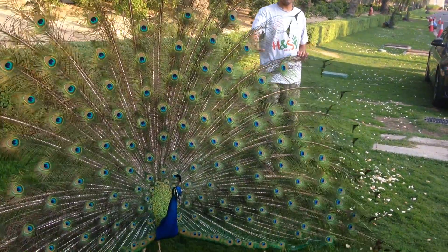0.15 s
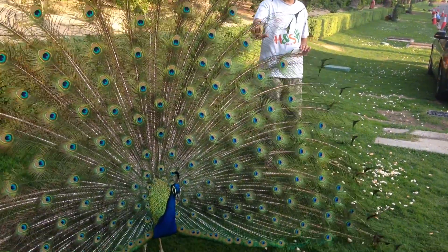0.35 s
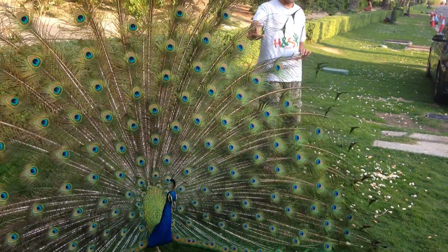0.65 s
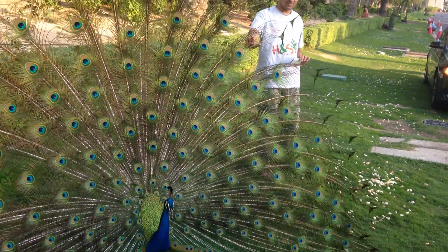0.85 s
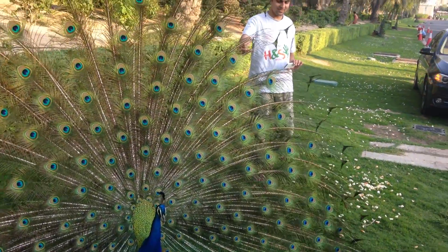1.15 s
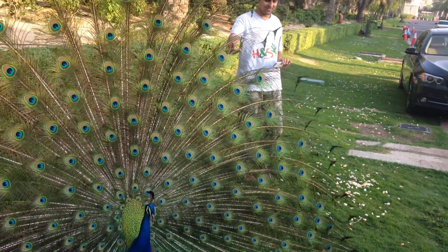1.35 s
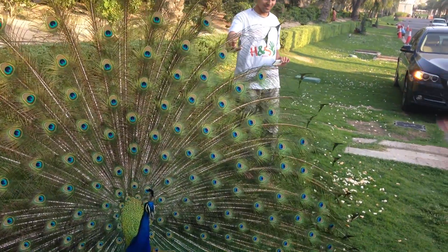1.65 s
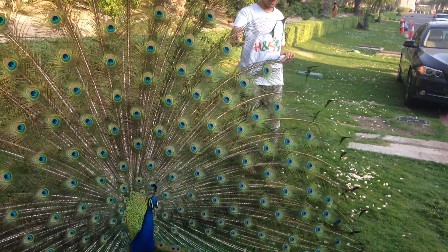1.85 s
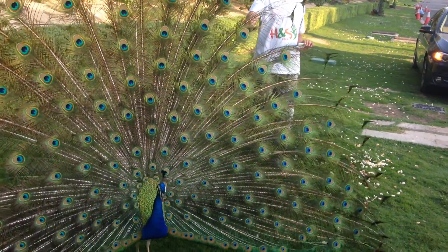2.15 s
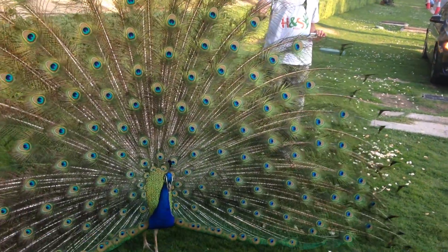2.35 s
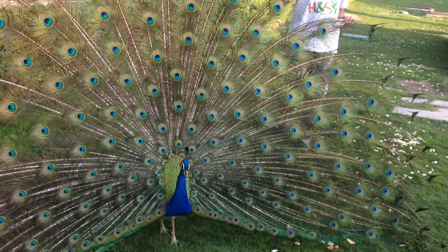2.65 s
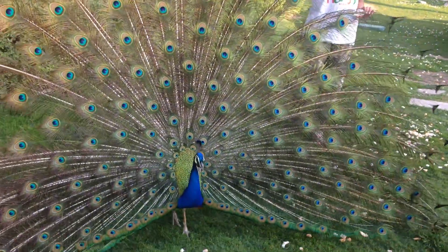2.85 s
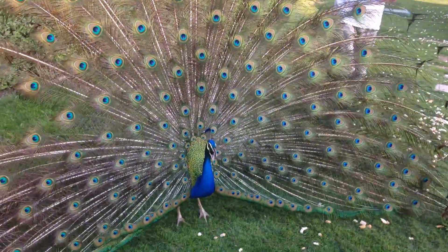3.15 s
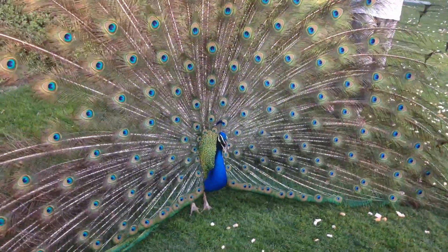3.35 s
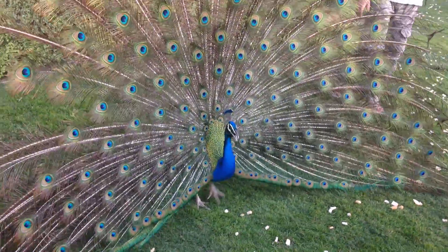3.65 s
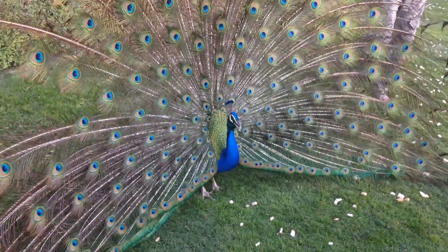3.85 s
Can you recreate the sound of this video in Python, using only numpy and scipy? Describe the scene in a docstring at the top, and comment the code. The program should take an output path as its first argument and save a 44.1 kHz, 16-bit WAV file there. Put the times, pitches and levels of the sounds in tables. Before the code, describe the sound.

A peacock screams loudly, close by, from about 2.8 to 3.7 seconds, harsh and throbbing with a faint echo; a second call starts near 3.9 seconds and is cut off. Before this, small birds chirp and a dove coos far off, a nearer bird whistles two notes six times, and something thuds softly near 1.8 seconds. An idling engine and traffic rumble throughout, with a faint outdoor hiss.

```python
"""A peacock screams close to the microphone, on a lawn: one full call and the start of a second, its voice
a stack of overtones that throbs about 46 times a second and echoes faintly off hedges and walls.
Before it, small birds chirp far off, a dove coos, a nearer bird repeats a whistled two-note call, and
something thuds softly. An idling engine and traffic rumble throughout, under a faint outdoor hiss.
One microphone feeds both channels."""
import sys
import numpy as np
from scipy import signal
from scipy.fft import rfft, irfft, next_fast_len
from scipy.io import wavfile
from scipy.ndimage import uniform_filter1d, map_coordinates

SR = 44100
rng = np.random.default_rng(int(sys.argv[2]) if len(sys.argv) > 2 else 0)


def transcribe(signal):
    """Save signal, clipped to [-1, 1], as a 16-bit WAV file at the path in sys.argv[1]."""
    frames = np.atleast_2d(signal).T
    limited = np.clip(frames, -1, 1)
    pcm = np.round(limited * 32767).astype(np.int16)
    wavfile.write(sys.argv[1], SR, pcm)


N = 176400
T = np.arange(N) / SR

# Level of the low rumble, with a dip under the scream where a recorder's automatic gain would duck it.
# Each row: time in seconds, level in dB.
RUMBLE_LEVELS = [(0, -50.5), (.45, -47), (.7, -49.5), (.95, -49), (1.1, -45), (1.35, -45.5), (1.5, -46.5),
                 (2.0, -48.5), (2.3, -47.5), (2.55, -49.5), (2.75, -44), (2.9, -51.5), (3.05, -47),
                 (3.15, -55.5), (3.45, -53.5), (3.6, -53.5), (4.0, -50)]
# Spectra of the traffic and the outdoor hiss. Each row: frequency in Hz, relative level in dB.
TRAFFIC_SPECTRUM = [(13, -64), (22, -20), (70, -2), (86, 0.5), (118, -8.5), (172, -11), (225, -17.5),
                    (249, -17), (278, -35), (328, -35.5), (363, -37.5), (407, -28.5), (450, -48),
                    (580, -68.5), (990, -120)]
HISS_SPECTRUM = [(180, -21.5), (300, -0.5), (455, -10), (528, -3.5), (2170, -19), (2480, -19),
                 (4910, -18.5), (6300, -23.5), (14500, -27.5), (16000, -40)]
# Far birds. Each row: start and length in seconds, first, middle and last pitch in Hz, level in dB.
FAR_CHIRPS = [(.02, .04, 4900, 4670, 4500, -73), (.12, 0.036, 4600, 4900, 4700, -76),
              (0.088, 0.033, 2480, 2480, 2450, -71), (0.185, 0.035, 4760, 4800, 4750, -73),
              (.225, 0.027, 2480, 2470, 2460, -77), (0.294, 0.025, 5900, 4970, 4500, -77),
              (0.306, .03, 5300, 4500, 4170, -71), (0.334, 0.062, 4340, 4186, 4210, -68),
              (0.371, 0.037, 2930, 2896, 2920, -64.5), (0.527, 0.022, 3420, 3400, 3400, -75),
              (0.556, 0.032, 4920, 4440, 3480, -69), (0.581, 0.006, 2650, 2590, 2580, -57),
              (0.791, .025, 4040, 3860, 4000, -70), (.82, .03, 3250, 3500, 4140, -71),
              (1.126, 0.033, 2690, 2680, 2250, -68), (1.331, 0.03, 3200, 3830, 4200, -64),
              (1.35, 0.066, 4180, 4050, 3270, -58.5), (1.339, 0.056, 4320, 4660, 4200, -62),
              (1.442, 0.043, 2680, 2690, 2600, -60.5), (1.594, 0.024, 3820, 3540, 3200, -63),
              (1.747, 0.04, 2730, 2710, 2470, -63.5), (1.98, 0.019, 3450, 3410, 3500, -70.5),
              (2.004, 0.023, 2920, 2660, 2550, -72), (2.354, 0.042, 5160, 4520, 3200, -68),
              (2.375, 0.051, 4150, 4700, 5500, -69), (2.38, 0.044, 2490, 2380, 2350, -69),
              (2.473, .025, 5020, 4780, 4780, -67.5), (2.508, 0.019, 2750, 2740, 2750, -68),
              (2.63, .075, 2410, 2660, 2740, -65.5)]
DOVE_COOS = [(.27, 0.2, 504, 535, 480, -65), (1.085, 0.19, 484.5, 521, 507, -61.5),
             (1.35, 0.38, 520.4, 512.5, 489, -64.5), (2.28, 0.2, 537, 538, 520, -67)]
# The nearer bird. Each row: start of the second note in seconds, first note's pitch in Hz and level in
# dB, second note's pitch in Hz, length in seconds, level in dB and overtone level in dB, and the first
# note's sag as a share of its pitch.
TWO_NOTE_CALLS = [(0.598, 3117, -61, 2052, 0.09, -67, -68.5, 0.028),
                  (0.907, 2810, -58, 2040, 0.074, -59, -69, -0.016),
                  (1.194, 2770, -55.5, 2080, 0.088, -60, -65, .06),
                  (1.506, 2883, -56.5, 2057, 0.081, -66, -63.5, -.08),
                  (1.817, 2836, -54, 1976, 0.085, -59.5, -68, -0.015),
                  (2.142, 2860, -56.5, 2056, 0.089, -64, -64.5, 0.018)]
# Partials of its notes and rasps. Each row: multiple of the pitch, relative level in dB.
FIRST_NOTE_PARTIALS = [(.5, -14), (1.5, -16), (2, -15), (2.5, -22), (3, -21), (3.5, -24)]
SECOND_NOTE_PARTIALS = [(2, 3), (3, -3), (4, -13), (5, -14)]
RASP_PARTIALS = [(1, -2), (.9, 0), (.8, 0), (.71, 0)]
# The thud's modes. Each row: frequency in Hz, relative level in dB, seconds to die away by 60 dB.
THUD_MODES = [(201, 7, 0.081), (116, 3.5, 0.11), (305, -27, .05)]
# The peacock, one list a call. Each row: time in seconds, pitch in Hz, levels of partials 1, 2, 3, 4
# and of the higher ones together in dB, beak posture 0-4, throb depth 0-1, throbs a second,
# hoarseness 0-1.
SCREAMS = [
    [(2.82, 585, -56, -64, -74, -90, -89, -8, 0.3, 43, .28),
     (2.832, 611, -38, -36.5, -49, -80, -47.5, 0.5, 0.25, 36, 0.2),
     (2.861, 675, -33.5, -37, -59, -66, -41, 4, 0.55, 56, 0.2),
     (2.868, 663, -35, -26, -41, -46, -31, 2, 0.9, 58, 0.3),
     (2.91, 694.5, -29, -27, -36, -32.5, -22, 3, 0.29, 53, 0.2),
     (2.94, 714, -24, -16.5, -18, -21.5, -17.5, 0, .1, 59, 0.15),
     (2.97, 725, -22.5, -18, -10, -21, -19, 0.5, 0, 50, 0.16),
     (3.015, 730, -24, -29, -11, -22.5, -19.5, -0.5, 0.15, 47.5, 0.02),
     (3.06, 727.8, -27.5, -23.5, -14, -20, -22.5, -2.5, 0.14, 65, 0.11),
     (3.13, 721.8, -29.5, -21, -17, -17.5, -21.5, 0, 0.08, 48, 0.09),
     (3.2, 724.2, -28.5, -15, -24, -18, -19, 0.5, 0.18, 60.5, 0.07),
     (3.27, 721.4, -27.5, -11, -33.5, -22.5, -20, 1, 0.02, 55, 0.04),
     (3.32, 710.2, -29.5, -15, -40.5, -32.5, -21.5, 2.74, 0.26, 59, 0.22),
     (3.38, 698, -30, -17, -47, -46, -25.5, 2, 0, 44.4, 0.12),
     (3.44, 700, -32.5, -9.5, -45, -48.5, -24, 2.5, 0.64, 48, 0.18),
     (3.488, 698, -32.5, -13, -44, -50, -24.5, 2, 0.58, 48, 0),
     (3.512, 695.4, -33.5, -11, -40, -53, -25.5, 1.5, 0.69, 50, 0.2),
     (3.57, 680, -34, -16, -32, -64, -29.5, 3, 0.87, 44, 0.01),
     (3.63, 660, -34, -28, -39, -63, -40, 3, 0.89, 50, 0.12),
     (3.69, 627.6, -34.5, -47.5, -60.5, -68, -57, 2.5, 1, 33, 0.02),
     (3.705, 655, -81, -75.5, -83, -97.5, -86.5, 4.5, 0.87, 68, 0.01)],
    [(3.853, 621, -54, -60, -80, -99.5, -75, 3, 0.53, 48, 0.4),
     (3.864, 660, -22.5, -31, -40, -77, -40, 2.63, 0.43, 28, 0.3),
     (3.88, 721.7, -21.5, -62.5, -58, -46.5, -44, 2.7, 0.75, 46, 0.45),
     (3.9, 764, -26, -46, -57, -43.5, -44, 2.8, 0.75, 39, 0.3),
     (3.926, 743, -18, -43, -51, -40, -41.5, 2.3, 0.5, 60, .4),
     (3.94, 708, -22, -24.5, -52, -55, -23.5, 4.7, 0.35, 38, 0.31),
     (3.97, 721, -24.5, -18.5, -48, -39.5, -21.5, 3.3, 0.71, 57, 0),
     (4.0, 712, -22, -21, -55, -40, -24, 4.4, 0, 37, 0.1)],
]
# Its tone in five beak postures, one list each, heard from partial 5 up.
# Each row: partial number, relative level in dB.
BEAK_POSTURES = [
    [(1, -12), (2, -11), (3, 0), (4, -9), (5, -19), (6, -13.5), (7, -16), (8, -21.5), (9, -26), (10, -23.5),
     (11, -26), (12, -21.5), (13, -19.5), (14, -21.5), (15, -25.5), (16, -29), (17, -27.5), (18, -25),
     (19, -40), (20, -43), (21, -41.5)],
    [(1, -14), (2, 0), (3, -14), (4, -7), (5, -24), (6, -22), (7, -20), (8, -11), (9, -12), (10, -15),
     (11, -19), (12, -15.5), (13, -19.5), (14, -22.5), (15, -25), (16, -26), (17, -30), (18, -38),
     (19, -30), (20, -33), (21, -39.5)],
    [(1, -18), (2, 0), (3, -32), (4, -39), (5, -29), (6, -18), (7, -19), (8, -23), (9, -24.5), (10, -25.5),
     (11, -34.5), (12, -33), (13, -31), (14, -31.5), (15, -33), (16, -44), (17, -51.5), (18, -63.5),
     (19, -56.5), (20, -61.5), (21, -53)],
    [(1, -4), (2, 0), (3, -12), (4, -37), (5, -21), (6, -28.5), (7, -28.5), (8, -29), (9, -27.5), (10, -23),
     (11, -21), (12, -33.5), (13, -36), (14, -29.5), (15, -37.5), (16, -37), (17, -43), (18, -39),
     (19, -33.5), (20, -41), (21, -49.5)],
    [(1, -1), (2, 0), (3, -30), (4, -21), (5, -9), (6, -15), (7, -18), (8, -29), (9, -10.5), (10, -4.5),
     (11, -13.5), (12, -14), (13, -13), (14, -17), (15, -17.5), (16, -22), (17, -16.5), (18, -25),
     (19, -22), (20, -32.5), (21, -20.5)],
]
# How its partials throb. Each row: multiple of the pitch, depth of its own beat 0-1, that beat's lead
# in radians, share of the common throb 0-1.
PARTIAL_THROBS = [(1.001, 0, 0, 0.69), (1.86, 0.36, 4, 0.95), (2.93, 0.09, 1.5, 0.86),
                  (4.255, 0.43, 5.5, 0.45), (5.07, 0.6, 4, 1), (6, 0.2, 4.5, 0.51), (7.1, 0.7, 2.46, 1),
                  (8.64, 0.7, 3, 0.94), (8.54, 0.8, -0.5, 0.8), (9.7, 0.2, 6, 1), (11.7, 0.4, 2, 1),
                  (13.6, 0.1, 5.5, 0.69), (21, 0.2, -5.5, 0.93)]
# Its breath. Each row: frequency in Hz, relative level in dB.
BREATH_SPECTRUM = [(400, -27), (1000, -8), (1700, -3), (2200, 2), (2700, -10), (4000, -22), (6500, -10),
                   (12000, -8.5), (16000, -27.5)]


def amp(db):
    """Decibels as an amplitude."""
    return 10 ** (np.asarray(db) / 20)


def unit(x):
    """x scaled to rms 1."""
    return x / np.sqrt(np.mean(x ** 2) + 1e-20)


def wobble(rate):
    """A smooth random curve, rate knots a second."""
    return map_coordinates(rng.standard_normal(int(N * rate / SR) + 4), [T * rate])


def filtered(x, response):
    """x through a gain that depends on frequency in Hz."""
    size = next_fast_len(N + SR // 2)
    return irfft(rfft(x, size) * response(np.fft.rfftfreq(size, 1 / SR)), size)[..., :N]


def rush(spectrum, patchy_db):
    """Coloured noise of rms 1 with patches of random gain."""
    bins = signal.stft(rng.standard_normal(N), nperseg=512)[2]
    patches = uniform_filter1d(uniform_filter1d(rng.standard_normal(bins.shape), 6, 0), 12, 1)
    noise = signal.istft(bins * amp(patchy_db * unit(patches)), nperseg=512)[1][:N]
    knot_hz, db = np.transpose([(10, -120), *spectrum, (SR / 2, -120)])
    return unit(filtered(noise, lambda hz: amp(np.interp(np.log(hz + 1), np.log(knot_hz + 1), db))))


def echoed(dry, db, t60_s, gap_s):
    """The direct sound and, after a gap, a diffuse dying echo."""
    t = T[:SR // 2]
    tail = rng.standard_normal(len(t)) * amp(-60 * t / t60_s) * (t > gap_s)
    return dry + amp(db) * signal.fftconvolve(dry, tail / np.linalg.norm(tail))[:N]


def add_whistle(out, start, hz, db, partials=((1, 0),), flutter_db=4.5, flutter_per_s=200):
    """Adds a soft-ended note along the pitch curve hz; each partial flutters in level."""
    u = np.linspace(0, 1, len(hz))
    knots = np.linspace(0, 1, int(len(hz) * flutter_per_s / SR) + 2)
    phase = 2 * np.pi * np.cumsum(hz) / SR
    note = 0
    for multiple, partial_db in partials:
        flutter = np.interp(u, knots, rng.normal(0, flutter_db, len(knots)))
        note += amp(partial_db + flutter) * np.sin(multiple * phase)
    fade = np.clip(9 * np.minimum(u, 1 - u), 0, 1)
    out[round(start * SR):][:len(hz)] += np.sqrt(2) * amp(db) * fade * note


def traffic_and_engine():
    """Low traffic noise with the wavering hum of an idling engine."""
    hum_hz = 89 + 3.88 * wobble(3.3)
    hum = np.sin(2 * np.pi * np.cumsum(hum_hz) / SR) * amp(-1 + 1.1 * wobble(11))
    level_db = np.interp(T, *np.transpose(RUMBLE_LEVELS))
    return amp(level_db) * unit(rush(TRAFFIC_SPECTRUM, patchy_db=1.5) + hum)


def outdoor_hiss():
    """The faint, steady noise of the open air."""
    return amp(-60.5) * rush(HISS_SPECTRUM, patchy_db=.7)


def far_birds():
    """Small birds and a dove, far off: each chirp or coo is one whistle bent through three pitches."""
    out = np.zeros(N)
    for start, length, first, middle, last, db in FAR_CHIRPS + DOVE_COOS:
        u = np.linspace(-1, 1, round(length * SR))
        hz = middle + (last - first) / 2 * u + ((first + last) / 2 - middle) * u ** 2
        add_whistle(out, start, hz, db)
    return out


def two_note_bird():
    """The nearer bird: grit, a short high note, flicks, a longer note that drops to its pitch, a rasp."""
    out = np.zeros(N)
    grit_s, lead_s, flick_s, flick_gap_s, rasp_s = .018, .043, .022, .005, .028
    grit_hz = np.geomspace(3300, 2900, round(grit_s * SR))
    rasp_hz = np.geomspace(3920, 3236, round(rasp_s * SR))
    scratchy = dict(partials=RASP_PARTIALS, flutter_db=9, flutter_per_s=900)
    flick_t = T[:round(flick_s * SR)]
    flick_hz = 2400 + 2300 * np.exp(-flick_t / .0045)
    flick_swell_db = 3 * (flick_t / flick_s - 1)
    for start, first_hz, first_db, second_hz, length, second_db, overtone_db, sag in TWO_NOTE_CALLS:
        sagging_hz = first_hz * np.linspace(1 + sag / 2, 1 - sag / 2, round((lead_s - flick_gap_s) * SR))
        add_whistle(out, start - lead_s, sagging_hz, first_db, [(1, 0), *FIRST_NOTE_PARTIALS],
                    flutter_per_s=400)
        add_whistle(out, start - lead_s - grit_s, grit_hz, first_db - 15, **scratchy)
        end = start + length
        closing_hz = 1900 + (2 * second_hz - 1900) * np.exp(-flick_t / .009)
        for k in range(2):  # a doubled downward flick joins the notes; a slower pair ends the call
            add_whistle(out, start + (k - 2) * flick_gap_s, flick_hz, first_db + flick_swell_db)
            add_whistle(out, end + (k - .5) * .006, closing_hz, overtone_db + 3.5, flutter_per_s=400)
        t = T[:round(length * SR)]
        glide_hz = second_hz * (1 + .2 * np.exp(-t / .011))
        add_whistle(out, start, glide_hz, second_db + 10 * (1 - 2 * t / length))
        add_whistle(out, start + .004, glide_hz[round(.004 * SR):], overtone_db, SECOND_NOTE_PARTIALS)
        add_whistle(out, end - .004, rasp_hz, overtone_db - 6.5, **scratchy)
    return out


def thud(start_s=1.763):
    """One soft knock: three low modes that die away quickly."""
    t = np.clip(T - start_s, 0, None)
    attack = 1 - np.exp(-t / .005)
    ring = sum(amp(db - 60 * t / t60) * np.sin(2 * np.pi * hz * t) for hz, db, t60 in THUD_MODES)
    return amp(-34) * attack * ring


def pulse(phase, sharpness=2.08):
    """The shape of a throb, -1 to 1: peaked for sharpness above 1, flat-topped below."""
    return 2 * ((1 + np.cos(phase)) / 2) ** sharpness - 1


def scream(rows, crest_s, swing_hz=13, jitter_hz=18):
    """One peacock call: breath and harmonics that throb in level and pitch, one throb at crest_s."""
    times, *columns = np.transpose(rows)
    on = (T >= times[0]) & (T <= times[-1])
    t = T[on]
    hz, *low_db, high_db, posture, depth, rate, hoarse = [np.interp(t, times, c) for c in columns]
    throb = 2 * np.pi * np.cumsum(rate) / SR
    throb -= np.interp(crest_s, t, throb)
    late_throb = throb - .58  # the upper partials and the breath lag behind
    hz = hz + swing_hz * depth * np.cos(throb + 2.9) + jitter_hz * hoarse * wobble(150)[on]
    phase = 2 * np.pi * np.cumsum(hz) / SR
    beak_db = np.array([[db for _, db in partials[4:]] for partials in BEAK_POSTURES])
    beak_db = beak_db - 10 * np.log10(np.sum(amp(beak_db) ** 2, 1, keepdims=True))  # equal power
    multiples, *throb_columns = np.transpose(PARTIAL_THROBS)
    uneven_db = depth * wobble(45)[on]
    voice = np.zeros(len(t))
    for k in range(1, 5 + beak_db.shape[1]):
        beat, lead, share = [np.interp(k, multiples, c) for c in throb_columns]
        if k < 5:
            db = low_db[k - 1]
            skirt, skirt_per_s = .28 * hoarse * (k > 1), 380
        else:
            db = high_db + np.interp(posture, range(len(beak_db)), beak_db[:, k - 5])
            skirt, skirt_per_s = .03 * min(k, 14) * (1 + depth / 2), 270
            share *= .65  # the higher partials throb less
        common = pulse(throb, sharpness=.44) if k == 1 else pulse(late_throb if k > 3 else throb)
        own = pulse(throb + lead + .54 * wobble(13)[on])
        swell = 1 + share * depth * common + beat * (1 - depth) * own
        drift_db = 1.2 * (k > 4) * wobble(24.8)[on] + 5 * (k > 1) * hoarse * wobble(90)[on]
        # Fast flutter of level and phase spreads a skirt of noise around the partial.
        swell *= 1 + skirt * wobble(skirt_per_s)[on]
        slip = skirt * (1 + depth) * wobble(skirt_per_s)[on]
        slip += 6 * (k > 2) * hoarse ** 2 * wobble(450)[on]  # hoarseness scrambles the phase
        tone = np.sin(k * phase + slip + rng.uniform(0, 2 * np.pi))
        voice += np.sqrt(2) * amp(db + drift_db + uneven_db) * swell * tone
    breath_gain = amp(high_db - 11) * hoarse * (1 + depth * np.cos(late_throb))
    out = np.zeros(N)
    out[on] = voice + breath_gain * rush(BREATH_SPECTRUM, patchy_db=-.5)[on]
    return out


def peacock():
    """Both calls, close to the microphone, with their faint echo from hedges and walls."""
    calls = scream(SCREAMS[0], crest_s=3.578) + scream(SCREAMS[1], crest_s=3.966)
    return echoed(calls, db=-33, t60_s=.45, gap_s=.039)


def scene():
    """The lawn from one spot, alike on both channels; the smaller birds echo briefly in the trees."""
    birds = echoed(two_note_bird() + far_birds(), db=-5, t60_s=.16, gap_s=.004)
    return np.tile(peacock() + birds + thud() + traffic_and_engine() + outdoor_hiss(), (2, 1))


def record(dry):
    """A soft limiter rounds the scream's loudest peaks; nothing passes above the band limit."""
    ceiling, knee, top_hz = .85, 5, 15600
    rounded = dry / (1 + np.abs(dry / ceiling) ** knee) ** (1 / knee)
    return filtered(rounded, lambda hz: hz < top_hz)


dry = scene()
out = record(dry)
transcribe(out)
```